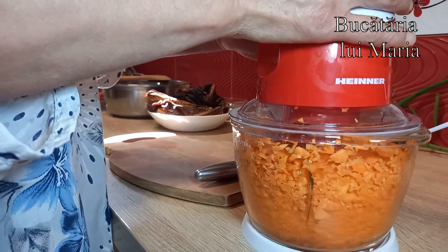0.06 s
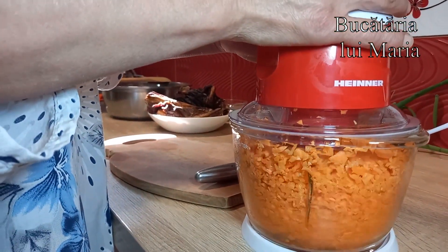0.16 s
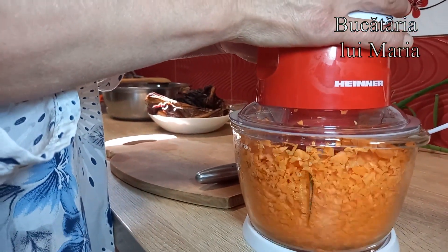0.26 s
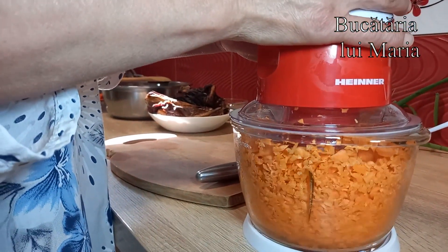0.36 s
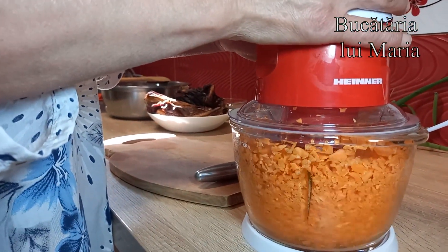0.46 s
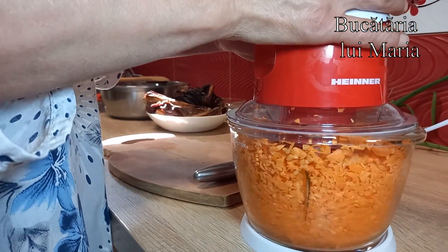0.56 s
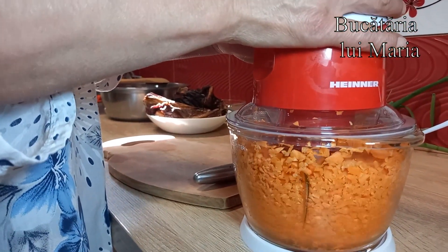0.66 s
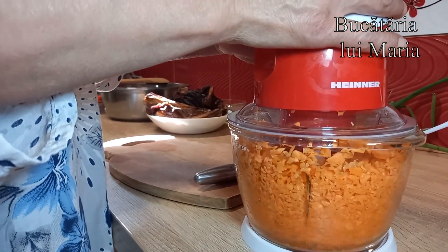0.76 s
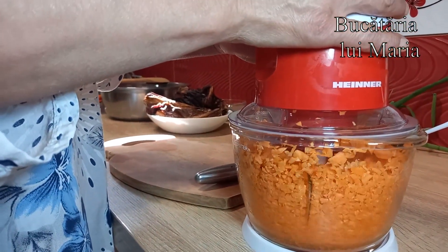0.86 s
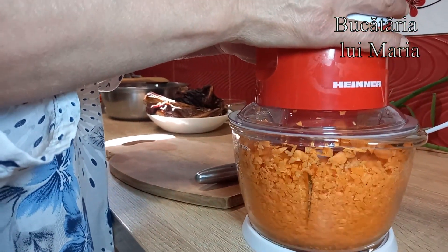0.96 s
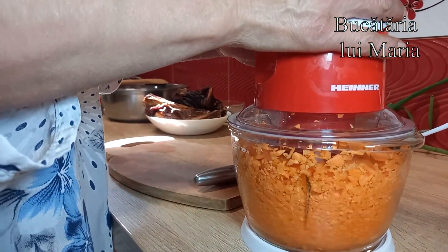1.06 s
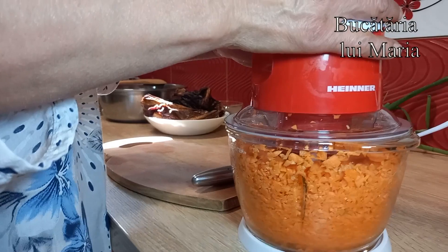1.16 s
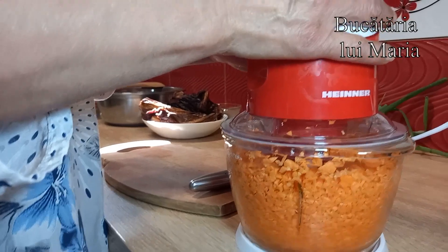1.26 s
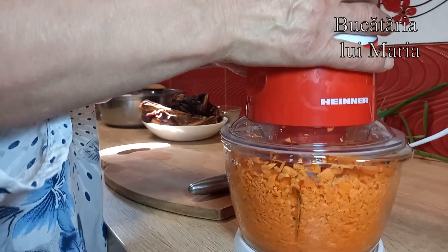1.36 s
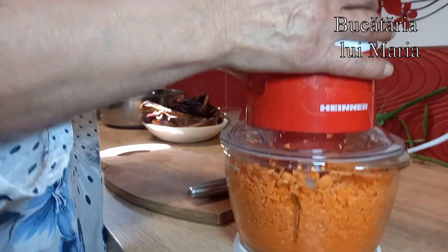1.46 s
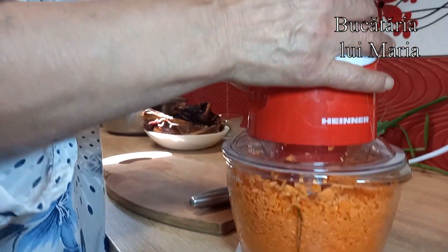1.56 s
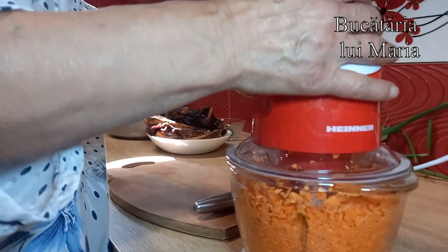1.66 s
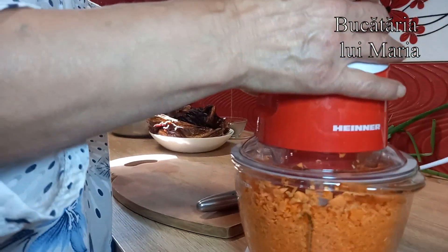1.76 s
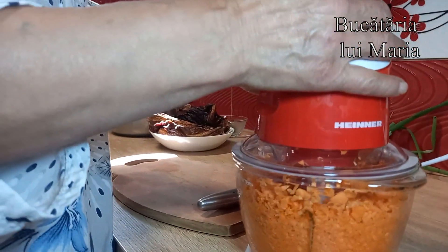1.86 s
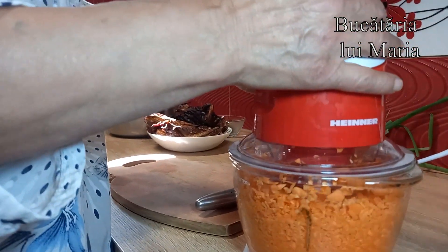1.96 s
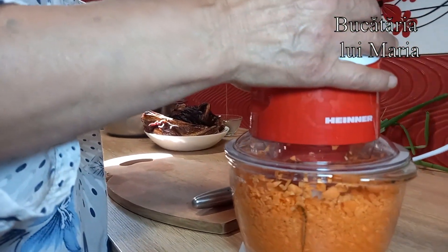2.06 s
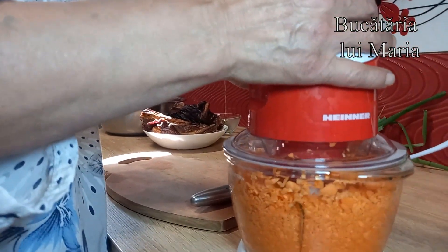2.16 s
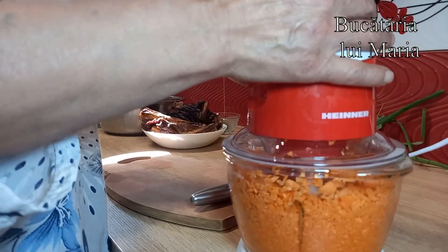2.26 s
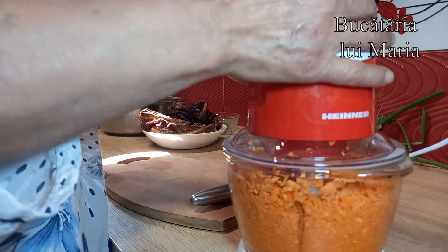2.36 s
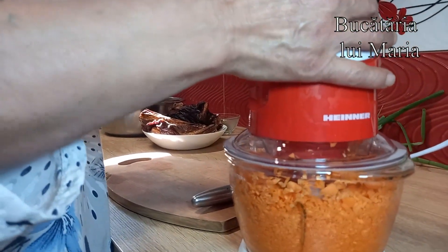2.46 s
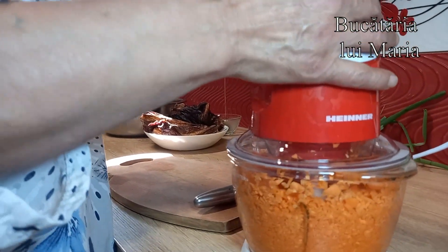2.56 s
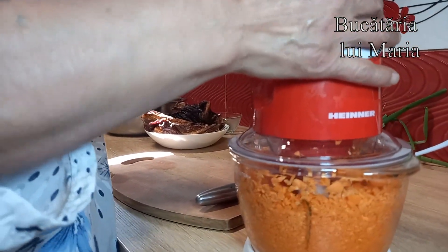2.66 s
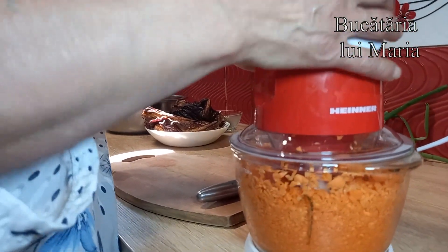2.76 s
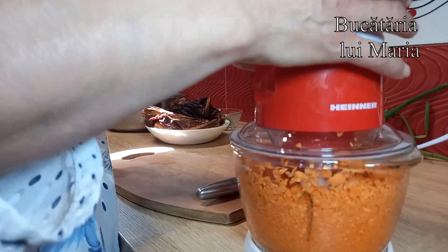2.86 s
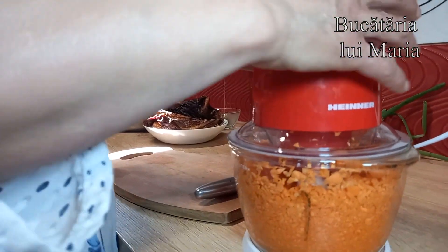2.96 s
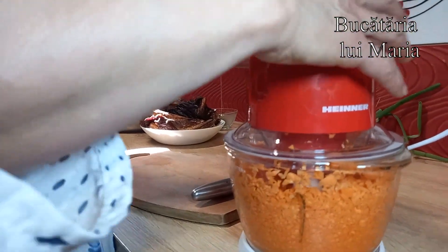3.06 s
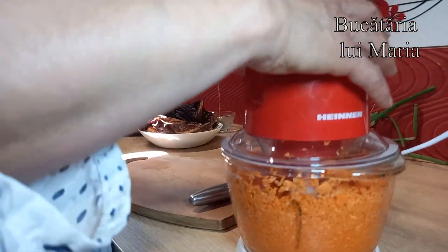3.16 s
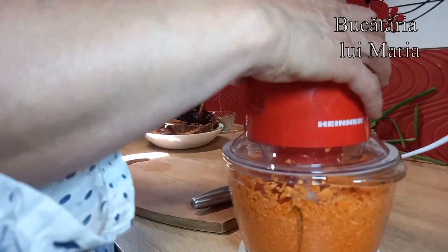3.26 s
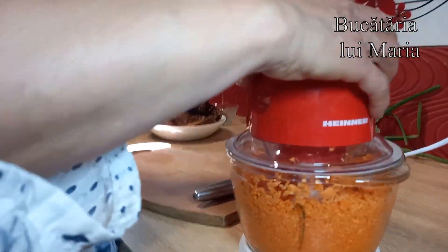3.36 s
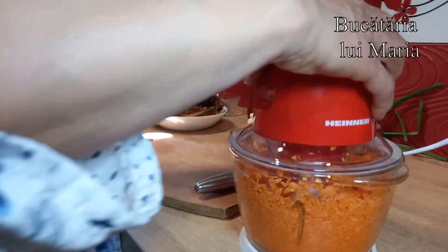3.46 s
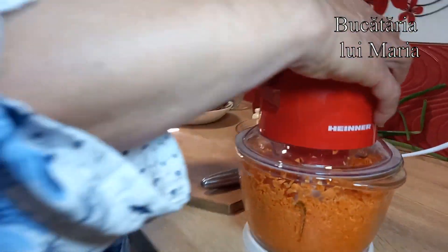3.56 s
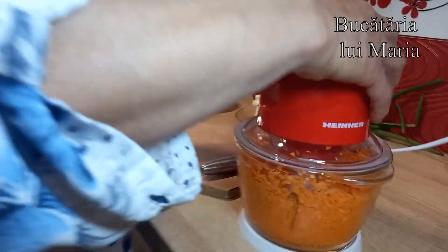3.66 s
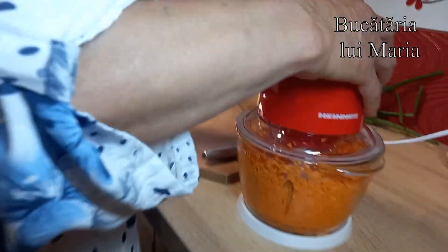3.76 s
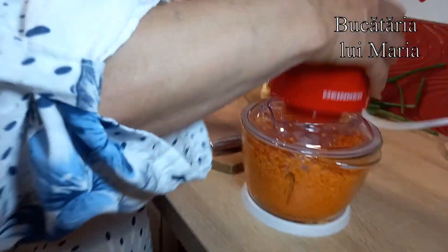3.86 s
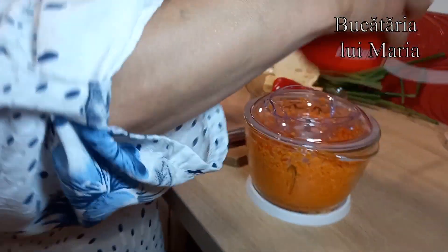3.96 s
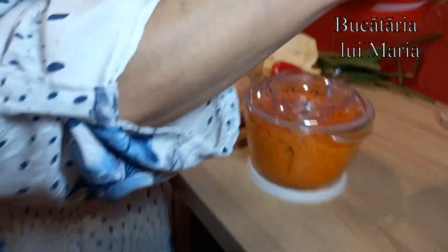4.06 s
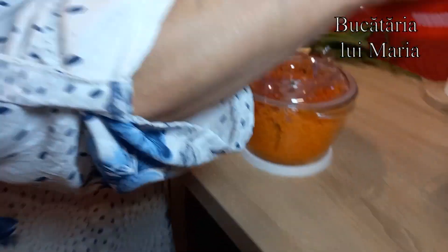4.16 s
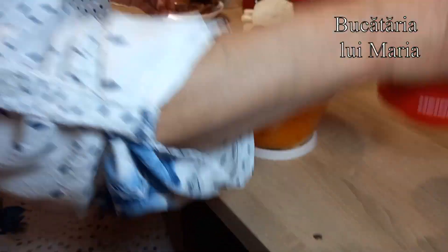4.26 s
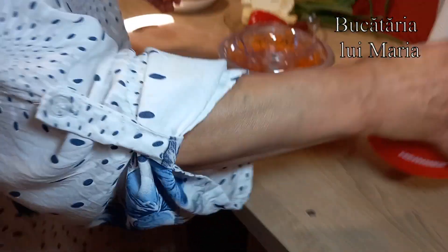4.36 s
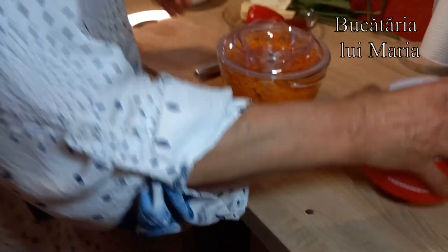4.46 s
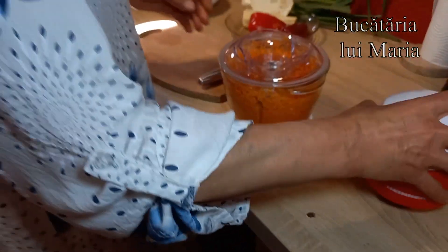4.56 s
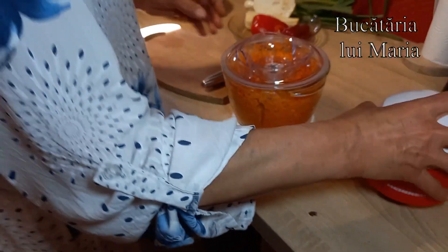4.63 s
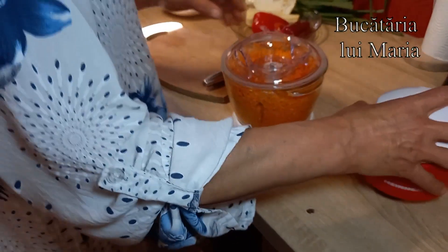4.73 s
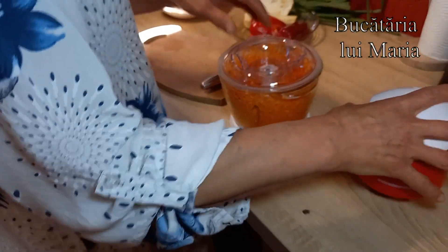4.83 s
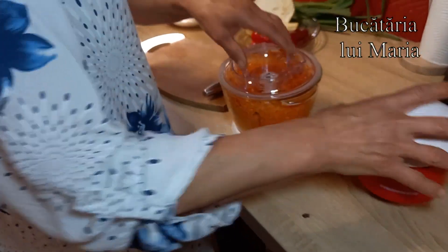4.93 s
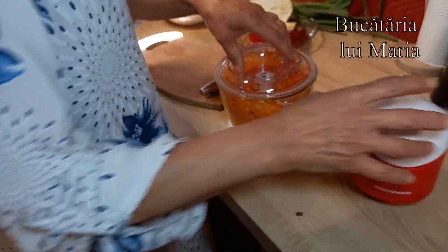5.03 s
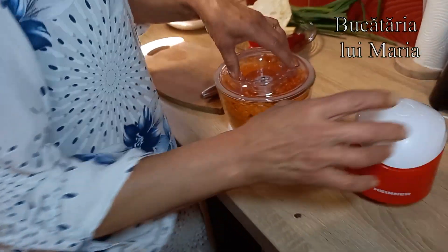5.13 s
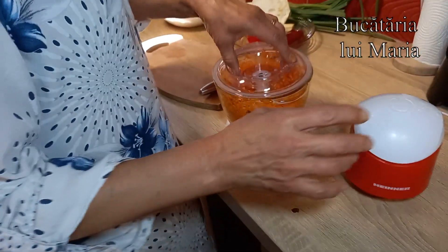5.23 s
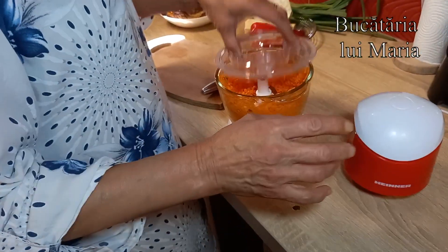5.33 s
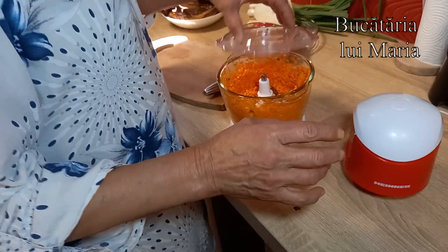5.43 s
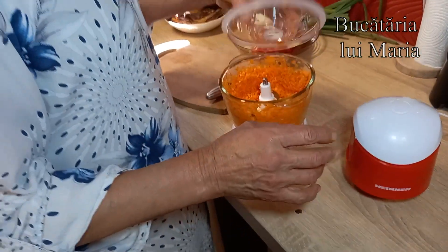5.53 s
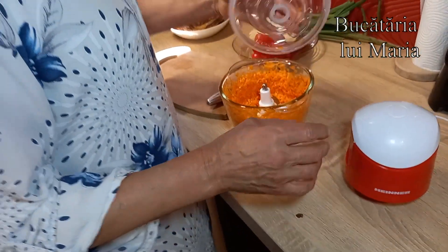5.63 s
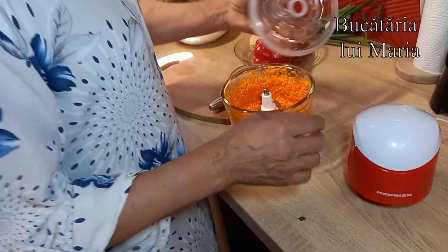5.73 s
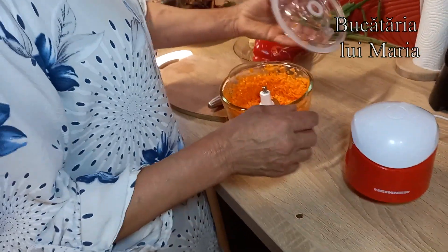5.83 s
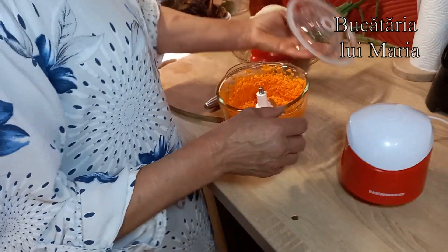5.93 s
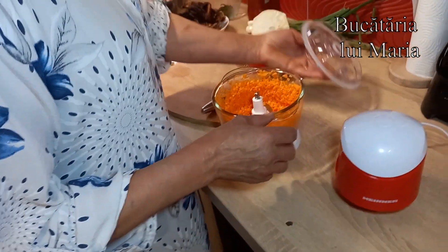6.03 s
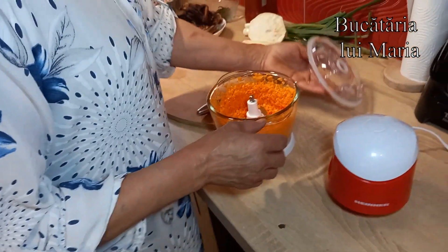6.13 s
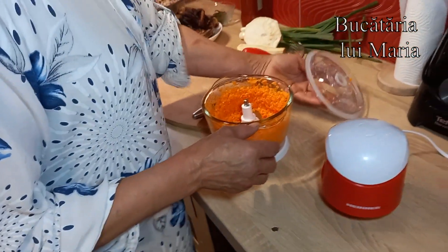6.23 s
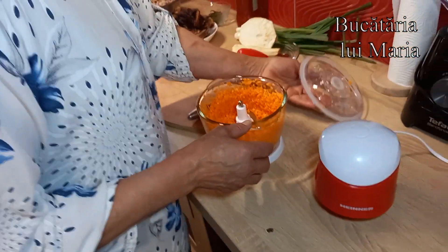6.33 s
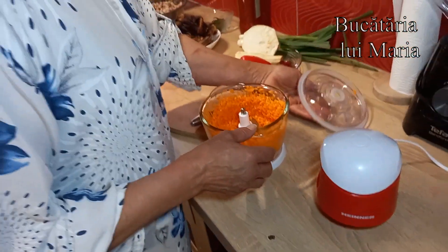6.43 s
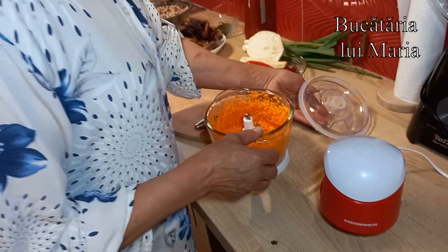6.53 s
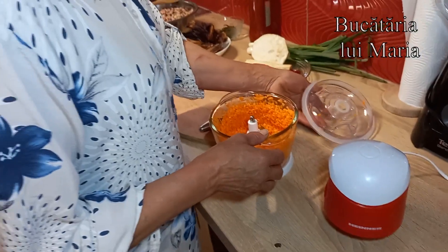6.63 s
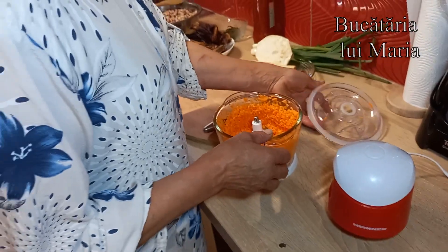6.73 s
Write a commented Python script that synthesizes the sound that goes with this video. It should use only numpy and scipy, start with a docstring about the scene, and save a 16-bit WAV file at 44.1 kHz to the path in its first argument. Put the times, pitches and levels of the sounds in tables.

```python
"""A small electric chopper whirs through carrot in a glass bowl, is switched off and coasts to rest.
Its roar is shaped noise with housing rings and drifting rotor tones; jolts and clatter are short bursts.
Hands lift the motor head, cutlery clinks, the head is set down and the plastic lid wobbles to rest:
clusters of dying modes plus cracks of noise, with a short room tail. Behind them: quiet kitchen air,
a faint hum and rustling sleeves."""
import sys
import numpy as np
from scipy import signal
from scipy.io import wavfile
from scipy.ndimage import uniform_filter1d

SR = 44100
rng = np.random.default_rng(int(sys.argv[2]) if len(sys.argv) > 2 else 0)


def generate_wav(signal):
    """Clip the signal to [-1, 1] and save it as 16-bit WAV at the path in sys.argv[1]."""
    frames = np.transpose(np.atleast_2d(signal))
    scaled = np.clip(frames, -1, 1) * 32767
    pcm = np.round(scaled).astype(np.int16)
    wavfile.write(sys.argv[1], SR, pcm)


N = 299439
T = np.arange(N) / SR
RUN = 3 * SR  # samples until the motor is silent
OFF_S = 2.41  # the switch opens


def gain_of(db):
    """Amplitude factor of a level in dB."""
    return 10 ** (np.asarray(db) / 20)


def evened(x):
    """Scales to rms 1."""
    return x / np.sqrt(np.mean(x ** 2) + 1e-20)


def slow(size=RUN, smooth=4000):
    """Slow random drift of rms 1."""
    return evened(uniform_filter1d(rng.standard_normal(size), size=int(smooth)))


def gesture(t, start, rise, hold, fall):
    """Envelope 0-1: straight rise, hold, exponential fall."""
    falling_s = np.maximum(t - start - rise - hold, 0)
    return np.clip((t - start) / rise, 0, 1) * np.exp(-falling_s / fall)


def wavering(hz, waver_hz, size=1500, count=RUN):
    """Tone of rms 1 whose pitch drifts, smoothed over size samples."""
    drift = slow(count, size)
    return np.sqrt(2) * np.sin(2 * np.pi * np.cumsum(hz + waver_hz * drift) / SR)


def coloured(points, patchy_db, size=N):
    """Noise of rms 1 with a spectrum (frequency [Hz], level [dB]) and drifting patches."""
    frames, bin_hz = size // 256 + 5, np.fft.rfftfreq(1024, 1 / SR)
    real, imag, patches = rng.standard_normal((frames, 513, 3)).T
    patches = uniform_filter1d(patches, size=24, axis=0)  # across frequency
    patches = evened(uniform_filter1d(patches, size=8, axis=1))  # across time
    point_hz, point_db = np.transpose(points)
    curve_db = np.interp(np.log(bin_hz + 1), np.log(point_hz + 1), point_db)
    spectra = (real + 1j * imag) * gain_of(curve_db[:, None] + patchy_db * patches)
    return evened(signal.istft(spectra, nperseg=1024, noverlap=768)[1][:size])


def resonate(x, hz, width_hz):
    """Resonance along the curve hz, rms 1: shifts it down to zero, smooths twice, shifts back."""
    turn = np.exp(2j * np.pi * np.cumsum(hz * np.ones(len(x))) / SR)
    pole = np.exp(-np.pi * width_hz / SR)
    smoothed = signal.lfilter([1], [1, -2 * pole, pole * pole], x / turn)
    return evened((turn * smoothed).real)


def ring(modes, blur, rise=0.000067, size=12000):
    """Dying modes (frequency [Hz], level [dB], t60 [s]), each three close beating partials; peak 1."""
    t, x = T[:size], np.zeros(size)
    for hz, db, t60 in modes:
        for level_luck, pitch_luck in rng.standard_normal((3, 2)):
            decay = gain_of(db + 2 * level_luck - 60 * t / t60)
            x += decay * np.sin(2 * np.pi * hz * (1 + blur * pitch_luck) * t + 2 * level_luck)
    x *= 1 - np.exp(-t / rise)
    return x / abs(x).max()


def snap(t60, top_hz, size=4000):
    """Short burst of noise, dull above top_hz; peak near 1."""
    lowpass = signal.butter(3, min(top_hz, 20000), fs=SR)
    noise = signal.lfilter(*lowpass, rng.standard_normal(size))
    return .5 * evened(noise) * gain_of(-60 * T[:size] / t60)


def add(mix, s, sound):
    """Adds a sound into the mix at s seconds."""
    part = mix[round(s * SR):][:len(sound)]
    part += sound[:len(part)]


def side_hiss():
    """Patchy hiss, added with opposite sign to the two channels."""
    # hiss spectrum: (frequency [Hz], level [dB per Hz])
    hiss_spectrum = [(25, -15.5), (1000, -22), (3000, -22), (6000, -2), (10000, -2.5), (11000, -7.5),
                     (16000, -12)]
    return gain_of(-87) * coloured(hiss_spectrum, 1.5)


def kitchen_air():
    """Steady shaped noise and a faint low hum."""
    # room air spectrum: (frequency [Hz], level [dB per Hz])
    air_spectrum = [(15, -35), (25, -7.5), (55, -1), (175, -24), (300, -14.5), (404, -20.5), (488, -16.5),
                    (622, -24), (1440, -27), (1560, -29.5), (9780, -22.5), (15900, -51)]
    hum = wavering(54.0, .8, size=4000, count=N)
    return gain_of(-72) * coloured(air_spectrum, 0.78) + gain_of(-77.5) * hum


def moving_arms():
    """Sleeves and hands: crackling cloth, fingers rubbing plastic and table rumble, as enveloped noise."""
    # movements: (start [s], hold [s], cloth [dB], rub [dB], rumble [dB])
    moves = [(2.699, 0.3, -70.5, -75, -74), (3.042, 0.34, -69.5, -77.5, -80.5),
             (3.437, 0.022, -65.5, -67.5, -68), (3.502, .31, -67, -73, -72.5),
             (3.95, 0.93, -77.5, -83.5, -84), (4.885, 0.34, -72, -78.5, -72),
             (5.3, 0.615, -75.5, -86, -82.5), (5.94, 0.228, -69.5, -73, -76), (6.202, 0.3, -72.5, -76, -72),
             (6.544, .25, -73.5, -80, -78)]
    # noise spectra: (frequency [Hz], level [dB per Hz])
    cloth_spectrum = [(1000, -31), (2800, -14), (4700, -2.5), (8000, -4), (10500, -12.5), (12000, -20.5),
                      (16000, -18.5)]
    rub_spectrum = [(100, -13), (350, 3.5), (700, -3.5), (1300, -3.5), (2500, -10.5), (5000, -17)]
    rumble_spectrum = [(30, -20), (70, -3), (150, -8.5), (250, -14), (1000, -63)]
    rise_s, fall_s, wander_db = 0.014, 0.018, 2
    t = T[::64]
    levels = sum(gain_of(db)[:, None] * gesture(t, s, rise_s, hold_s, fall_s) for s, hold_s, *db in moves)
    layers = []
    for level, spectrum in zip(levels, (cloth_spectrum, rub_spectrum, rumble_spectrum)):
        wander = gain_of(wander_db * slow(size=len(t), smooth=40))
        layers.append(np.interp(T, t, level * wander) * coloured(spectrum, 1.0))
    cloth, rub, rumble = layers
    starts = rng.random(N) < 25 / SR  # 25 crackles a second on average
    creases = 1 + 1.5 * signal.oaconvolve(starts, gain_of(-60 * T[:800] / 0.02))[:N]
    return creases * (cloth + rub) + rumble


def room(x):
    """Dense echoes dying away, the treble sooner."""
    t60_s = 0.19
    t, noise = T[:SR // 2], rng.standard_normal(SR // 2)
    dull = signal.lfilter([1], [1, -1.2, .4], noise) * gain_of(-60 * t / t60_s)
    bright = 1.4 * noise[::-1] * gain_of(-60 * t / (.5 * t60_s))
    tail = (dull + bright) * (t > .004)
    return signal.fftconvolve(x, tail / np.linalg.norm(tail))[:N]


def grip_pops():
    """Dull sticky pops of a grip letting go: dry, close clicks of a few cycles."""
    # pops: (time [s], peak [dB])
    pop_rows = [(5.955, -45), (5.967, -46.5), (5.985, -41), (5.999, -40), (6.024, -43), (6.031, -43),
                (6.058, -41), (6.064, -44), (6.073, -40.5), (6.107, -53), (6.626, -55), (6.664, -51.5)]
    modes = [(300, 3.5, 0.0038), (1000, -10, 0.0043), (2200, -17, 0.0023), (4260, -8, 0.002),
             (6950, -5.5, 0.0022)]  # (frequency [Hz], level [dB], t60 [s])
    out = np.zeros(N)
    for s, db in pop_rows:
        add(out, s, gain_of(db) * ring(modes, 0.19, size=800))
    return out


def finger_ticks():
    """Small plastic ticks under the fingers: bright and body rings with a crack."""
    # ticks: (time [s], ring peak [dB], bright ring [Hz], body ring [Hz], body re bright ring [dB])
    tick_rows = [(2.911, -57, 4260, 1087, 7), (3.258, -53.5, 5000, 605, -15),
                 (3.357, -55, 4040, 400, -22.5), (3.467, -60, 5000, 395, -2), (3.585, -53, 4170, 400, -14),
                 (3.668, -49, 4620, 1300, -4.5), (3.754, -46, 6250, 1350, -18), (3.781, -48, 5980, 407, 5),
                 (3.791, -36.5, 4760, 1460, -24), (3.815, -64, 4830, 367, -2),
                 (5.042, -55, 3780, 400, -6.5), (5.071, -31.5, 5050, 1730, -35),
                 (5.217, -45, 4950, 1410, -14), (5.611, -56, 4370, 400, -14)]
    out = np.zeros(N)
    for s, db, bright_hz, body_hz, body_db in tick_rows:
        modes = [(bright_hz, 0, .005), (1.2 * bright_hz, -4, .004), (.64 * bright_hz, -22, .02),
                 (body_hz, body_db, .03)]
        add(out, s, gain_of(db) * ring(modes, .05, rise=.0004, size=3000))
        add(out, s, gain_of(db - 6) * np.diff(snap(0.006, 8700), 2))
    return out


def rocking(count=18):
    """Rows (time [s], level [dB], hardness) of the lid on its rim: gaps shorten to a floor, blows weaken."""
    start_s, first_gap_s, shrink, least_gap_s = 6.2095, .0405, .7, .0112
    first_db, loss_db, spread_db, hardness = -22, 2.13, -1.5, 0.89
    k, luck = np.arange(count), rng.uniform(-1, 1, (count, 2))
    gaps_s = np.maximum(first_gap_s * shrink ** k, least_gap_s)
    times_s = start_s + np.cumsum(gaps_s) - gaps_s
    levels_db = first_db - loss_db * k + spread_db * luck[:, 0] * (k > 2)
    return list(zip(times_s, levels_db, np.clip(hardness + 0.1 * luck[:, 1], 0, 1)))


def lid_blows():
    """Plastic lid rocking and knocking: a hard blow reaches the high modes and cracks."""
    # single knocks: (time [s], ring peak [dB], hardness 0-1)
    knocks = [(6.195, -54, 0.9), (6.388, -38, .2), (6.472, -67, 1), (6.774, -31.5, 0.37),
              (6.784, -29.5, 0.07)]
    # lid modes: (frequency [Hz], level [dB], t60 [s])
    lid_modes = [(211, -11, 0.18), (649, 1.5, 0.083), (853, 4, 0.027), (1098, 5, 0.043), (1210, -7, 0.18),
                 (1290, -3.5, 0.14), (1413, -6, 0.17), (1837, 3, 0.034), (2220, -1.5, 0.02),
                 (2410, -9, 0.055), (3110, 5.5, 0.015), (3540, 4, 0.026), (4500, -14, 0.017),
                 (5030, 5, 0.017)]
    out = np.zeros(N)
    for s, db, hard in rocking() + knocks:
        modes = [(hz, mode_db - 7 * (1 - hard) * np.log2(1 + hz / 700), t60) for hz, mode_db, t60 in lid_modes]
        add(out, s, gain_of(db) * ring(modes, 0.043, size=6000))
        crack = snap(0.013, 8900) + 0.37 * snap(0.06, 7800)
        add(out, s, gain_of(db - 3) * hard * crack)
    return out


def lid_slide():
    """The lid drags on the table: a brief scrape of noise through four resonances."""
    out, noise = np.zeros(N), rng.standard_normal(6000)
    scrape = resonate(noise, 610, 90) + 0.87 * resonate(noise, 870, 75)
    scrape += 0.36 * resonate(noise, 1400, 600) + 0.19 * resonate(noise, 3800, 2500)
    envelope = gesture(T[:len(noise)], 0, rise=.005, hold=0.023, fall=0.0065)
    add(out, 6.716, gain_of(-52.5) * envelope * evened(scrape))
    return out


def head_set_down():
    """The motor head meets the table: a noise tick, shell modes and slower table modes."""
    # contacts: (time [s], tick [dB], shell [dB], table [dB])
    contacts = [(4.388, -26.5, -21.5, -54), (4.553, -30, -21, -32.5), (4.631, -61, -32, -41.5),
                (4.779, -56.5, -48, -71)]
    # modes: (frequency [Hz], level [dB], t60 [s])
    shell_modes = [(950, -15, .02), (2606, -12, .012), (3698, -6, .008), (4635, -2, .006), (5950, -3, .006),
                   (7300, -7, .007), (8516, -9, .007)]
    table_modes = [(81, 4, 0.071), (152, 3, 0.13), (281, -1, 0.043), (363, -11.5, 0.13), (610, -16, 0.059)]
    out = np.zeros(N)
    for s, tick_db, shell_db, table_db in contacts:
        add(out, s, gain_of(tick_db) * (snap(0.019, 8100) + 0.16 * snap(0.17, 9000)))
        add(out, s, gain_of(shell_db) * ring(shell_modes, .04, rise=.0003))
        add(out, s, gain_of(table_db) * ring(table_modes, 0.046, rise=0.003))
    return out


def cutlery_clinks():
    """Touched cutlery: long metal modes, a bright jangle and a dull burst."""
    # clinks: (time [s], ring peak [dB])
    clink_rows = [(4.247, -18.5), (4.256, -18.5), (4.269, -28)]
    # metal modes: (frequency [Hz], level [dB], t60 [s])
    metal_modes = [(2643, -11, .16), (2950, -8, .11), (3575, -19, .2), (3774, -8, .12), (4883, -14, .16),
                   (5044, -8, .15), (5588, -12, .2), (5841, 0, .15), (6115, -20, .2), (7348, -12, .16),
                   (7461, -3, .14), (7806, -6, .07), (7973, -10, .15), (8425, -14, .17), (8565, -10, .16),
                   (9491, -8, .16), (10240, -18, .14), (10560, -19, .14), (11540, -18, .14)]
    out = np.zeros(N)
    for s, db in clink_rows:
        add(out, s, gain_of(db) * ring(metal_modes, .007, rise=.0015))
        add(out, s, gain_of(db - 8) * np.diff(snap(.08, 9500), 2))
        add(out, s, gain_of(db - 33.0) * snap(0.23, 1700))
    return out


def hard_clatter():
    """Two knocks while the motor runs and a burst just after switch-off: cracks with three short rings."""
    # knocks: (time [s], level [dB])
    knock_rows = [(1.825, -19), (1.829, -19), (2.4353, -10), (2.4358, -16.5), (2.44, -19), (2.443, -14),
                  (2.449, -17.5)]
    modes = [(1210, 2.8, .07), (3380, 1, 0.026), (4240, 0.5, 0.018)]
    out = np.zeros(N)
    for s, db in knock_rows:
        add(out, s, gain_of(db) * (snap(0.0095, 7400) + 0.6 * ring(modes, 0.081, size=4000)))
    return out


def bowl_jolts():
    """The bowl jolts on the table: a sharp snap, then at once a fast pull down and a slow swing back."""
    # jolts: (time [s], low push [dB], snap [dB])
    jolt_rows = [(.19, -14, -50), (0.718, -20, -40), (1.06, -18, -44.5), (1.199, -33, -39),
                 (1.421, -19.5, -45), (1.601, -20, -45), (1.877, -12, -38), (2.159, -22, -45),
                 (2.4118, -5, 0)]
    snap_modes = [(4620, 1.0, 0.0046), (7150, 0.0, 0.0032), (10300, -6.0, 0.0017), (2300, -8, 0.0022)]
    out, t = np.zeros(N), T[:3000]
    swing = -np.cos(2 * np.pi * 65 * t + 3 * (1 - np.exp(-t / .0014)))
    push = swing * (np.exp(-t / .0013) + .37 * np.exp(-t / .018))
    for s, push_db, snap_db in jolt_rows:
        add(out, s - .0004, gain_of(snap_db) * ring(snap_modes, .05, size=600))
        add(out, s, gain_of(push_db) * push)
    return out


def carrot_spray(t):
    """Bits of carrot hit the glass: bright noise, a steady spray plus flung handfuls."""
    # handfuls: (start [s], level [dB], hold [s])
    handfuls = [(0.05, -35.5, .06), (.18, -44, 0.058), (.5, -42, .02), (.68, -51, 0.088),
                (1.24, -40, 0.025), (1.295, -46, .012), (1.457, -46, 0.018), (1.592, -40, 0.013),
                (1.635, -47, .012), (1.683, -45, .04), (1.817, -41, 0.017), (1.873, -52, 0.0086),
                (1.994, -51, 0.033)]
    # spray spectrum: (frequency [Hz], level [dB per Hz])
    spray_spectrum = [(3000, -29), (7000, -10), (10000, -2), (13000, -4.5), (16000, 2)]
    rise_s, fall_s = 0.0037, 0.0066
    flung = sum(gain_of(db) * gesture(t, s, rise_s, hold_s, fall_s) for s, db, hold_s in handfuls)
    return (gain_of(-54) + flung) * coloured(spray_spectrum, 1, size=RUN)


def hum_and_drone(t, hum_hz):
    """Motor hum and table drone, swelling and fading as bowl and table couple."""
    # drone: (time [s], level [dB])
    drone_curve = [(0, -32), (.11, -44.5), (.27, -27.5), (.35, -36), (.54, -31), (.74, -36.5), (.87, -27.5),
                   (1.18, -44), (1.42, -38), (1.52, -51.5), (1.65, -47.5), (1.75, -33.5), (2.12, -35.5),
                   (2.21, -43), (2.27, -32.5), (2.41, -36.5)]
    hum_mean_db, hum_share, hum_wander_db = -37.5, 0.23, 3  # the hum follows the drone by this share
    drone_db = np.interp(t, *np.transpose(drone_curve))
    hum_db = hum_mean_db + hum_share * (drone_db - drone_db.mean()) + hum_wander_db * slow()
    hum = gain_of(hum_db) * wavering(hum_hz, 1.2, size=4000)
    return hum + gain_of(drone_db) * wavering(152.9, 2.5, size=4000)


def rotor_whines(t, free_s, hum_hz):
    """Rotor tones on the gear-mesh pitch: rising once the carrot is fine, shaken by load, then slowing."""
    # tones: (multiple of mesh tone, sideband [hum steps], waver [Hz], level [dB])
    tones = [(.92, 0, 6, -21.5), (1.0, 0, 5, -16.5), (1.0, 1, 2.9, -33.5), (1.162, 0, 8, -29),
             (1.94, 0, 12, -18), (2.272, 0, 14, -14.5), (2.995, 0, 8.3, -11.5), (2.995, -1, 9.9, -18.5),
             (2.9, 0, 7, -15), (3.088, 0, 9, -16.5), (4.07, 0, 18, -17), (4.07, -1.7, 25, -22.5),
             (4.07, -2, 28, -19), (4.455, 0, 40, -14), (4.455, -1, 25, -29), (6.6, -0.48, 60, -31.5)]
    mesh_hz, ease_s, ease_hz_per_s, load_hz, spin_down_s = 1820, 1.55, 52, 5, 0.15
    eased_hz = ease_hz_per_s * np.clip(t - ease_s, 0, OFF_S - ease_s)
    mesh = (mesh_hz + eased_hz + load_hz * slow()) * np.exp(-free_s / spin_down_s)
    return sum(gain_of(db) * wavering(k * mesh + step * hum_hz, waver_hz) for k, step, waver_hz, db in tones)


def powered_roar(t, noise, whines):
    """Blade, gear and fan noise with housing, bowl and shell rings and whines, pulsed by the torque."""
    # blade, gears and fan: (frequency [Hz], level [dB per Hz])
    roar_spectrum = [(15, -52.5), (25, -22), (91, -7.5), (123, -11.5), (149, -7), (317, -10), (404, -8.5),
                     (884, -14), (1780, -16.5), (2980, -28), (3600, -24.5), (5400, -14), (6020, -18.5),
                     (7470, -22), (15900, -43.5)]
    # housing and bowl rings: (frequency [Hz], width [Hz], level [dB])
    housing_rings = [(215, 30, -14), (405, 40, -14), (520, 60, -12), (1010, 80, -14), (1690, 90, -15),
                     (3530, 300, -11), (3750, 200, -14), (4450, 150, -14), (5000, 400, -14),
                     (7330, 300, -14)]
    # shell ring shifting as the palm presses: (time [s], frequency [Hz])
    grip_curve = [(0, 5700), (.3, 5360), (1.0, 5380), (1.2, 5200), (1.75, 5280), (2.0, 5320), (2.41, 5420)]
    body = coloured(roar_spectrum, 0.64, size=RUN) + whines
    body += sum(gain_of(db) * resonate(noise, hz, width_hz) for hz, width_hz, db in housing_rings)
    body += gain_of(-9) * resonate(noise, np.interp(t, *np.transpose(grip_curve)), 280)
    body *= 1 + 0.1 * wavering(102, 3, size=4000)  # torque peaks twice per mains cycle
    return evened(body)


def coasting_roar(noise, whines):
    """Roar of the coasting blade: patchy noise, weaker whines and one shell ring."""
    # coasting blade: (frequency [Hz], level [dB per Hz])
    rundown_spectrum = [(15, -60), (25, -29), (123, -12), (149, 5.5), (235, -10.5), (393, 0), (450, -13),
                        (1190, -3.5), (2280, -21.5), (5700, -12.5), (6700, -21.5), (8780, -24),
                        (15900, -37)]
    return coloured(rundown_spectrum, 2.5, size=RUN) + .34 * whines + .25 * resonate(noise, 5650, 200)


def motor():
    """Powered roar crossfades to the coasting blade; slowing gears groan until the rotor stops."""
    # roar after the switch opens: (time [s], level [dB])
    coast_curve = [(2.42, -28.5), (2.428, -30), (2.436, -22), (2.454, -30), (2.52, -35), (2.634, -50.5),
                   (2.71, -71.5)]
    hum_hz, split_hz = 100.3, 3100
    body_db, treble_db, wander_db, coast_treble_db = -26.5, -29, 1.27, 0.5
    coarse_db, coarse_s = 4, 0.26  # coarse pieces make the low roar louder at first
    groan_db, groan_sag_db_per_s, stop_s, stop_db_per_s = -41.5, 19.5, 2.635, 400.5
    t, noise = T[:RUN], rng.standard_normal(RUN)
    powered = np.clip((OFF_S + .025 - t) / .02, 0, 1)
    coasting, free_s = 1 - powered, np.maximum(t - OFF_S, 0)

    whines = rotor_whines(t, free_s, hum_hz)
    body = powered * powered_roar(t, noise, whines) + coasting * coasting_roar(noise, whines)
    treble = signal.sosfilt(signal.butter(4, split_hz, "high", fs=SR, output="sos"), body)
    low = signal.sosfilt(signal.butter(4, split_hz, fs=SR, output="sos"), body)

    coast_db = np.interp(t, *np.transpose(coast_curve), right=-150)
    run_db = body_db + coarse_db * np.exp(-t / coarse_s) + wander_db * slow()
    low_gain = gain_of(powered * run_db + coasting * coast_db)
    treble_gain = gain_of(powered * treble_db + coasting * (coast_db + coast_treble_db))
    groan_gain = gain_of(groan_db - groan_sag_db_per_s * free_s - stop_db_per_s * np.maximum(t - stop_s, 0))
    groan = coasting * groan_gain * resonate(noise, 350, 130)
    out = low_gain * low + treble_gain * treble + groan
    out += powered * (hum_and_drone(t, hum_hz) + carrot_spray(t))
    return np.r_[out, np.zeros(N - RUN)]


def scene():
    """All sources in the middle, struck objects also through the room, hiss at the sides."""
    struck = finger_ticks() + lid_blows() + lid_slide() + head_set_down() + cutlery_clinks() + hard_clatter()
    background = kitchen_air() + moving_arms()
    mid = background + grip_pops() + struck + gain_of(-8.5) * room(struck) + bowl_jolts() + motor()
    side = side_hiss()
    return np.array([mid + side, mid - side])


def record(dry):
    """Bass roll-off of the microphone, full-scale clipping, then the band limit."""
    bass_cut = signal.firwin(4001, 36, pass_zero=False, fs=SR)
    thin = signal.fftconvolve(dry, bass_cut[None], "same")
    band_limit = signal.firwin(511, 15830, window=("kaiser", 9), fs=SR)
    return signal.oaconvolve(np.clip(thin, -1, 1), band_limit[None], "same")


dry = scene()
out = record(dry)
generate_wav(out)
```